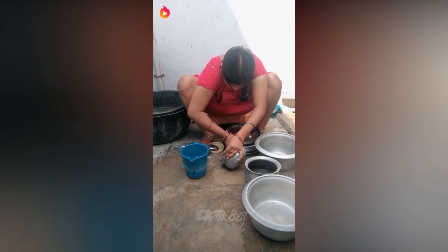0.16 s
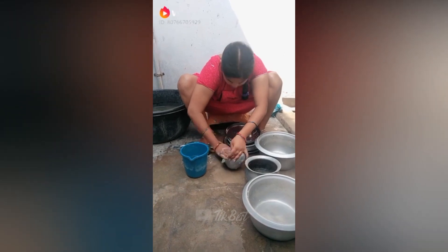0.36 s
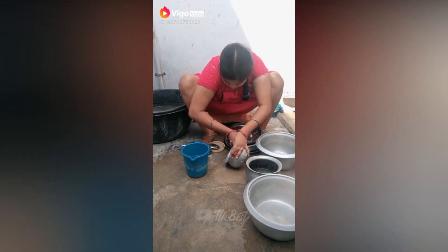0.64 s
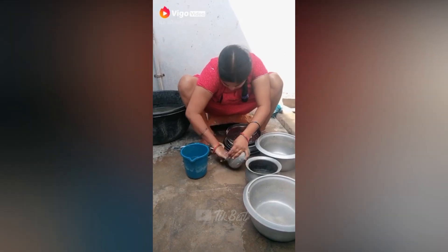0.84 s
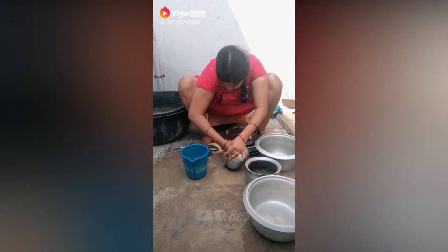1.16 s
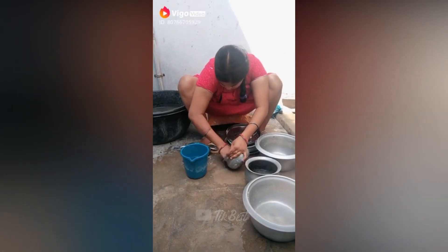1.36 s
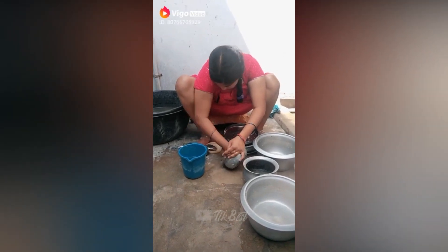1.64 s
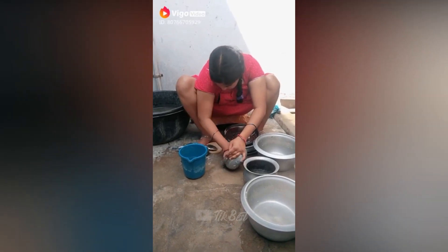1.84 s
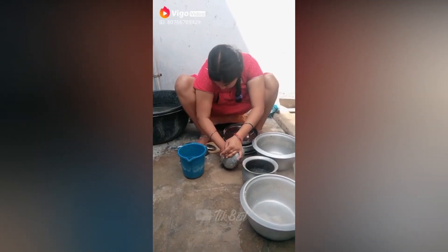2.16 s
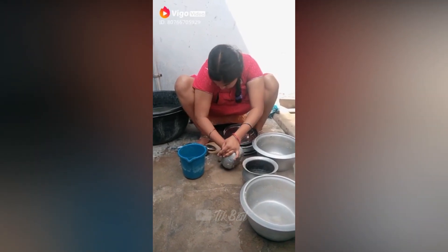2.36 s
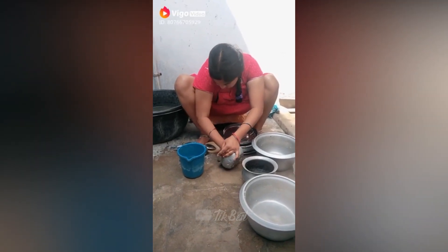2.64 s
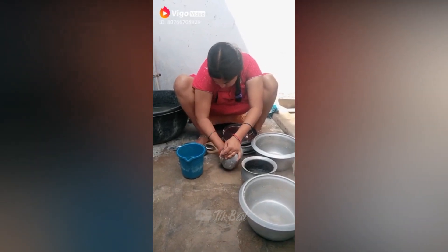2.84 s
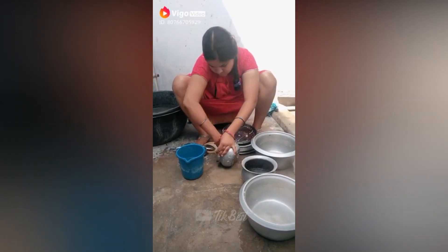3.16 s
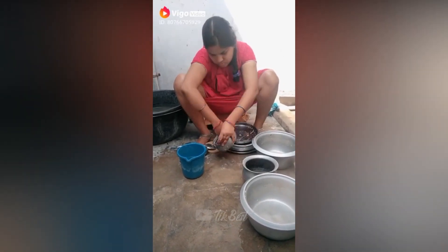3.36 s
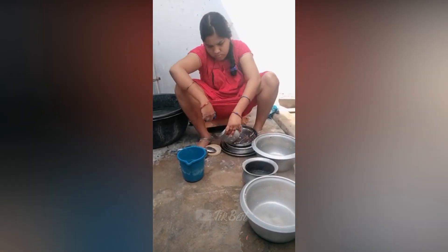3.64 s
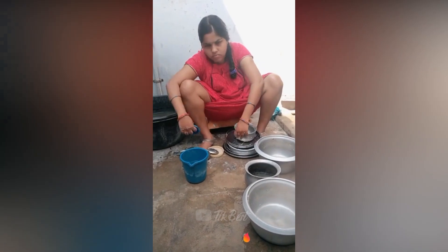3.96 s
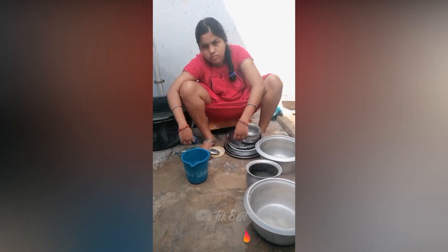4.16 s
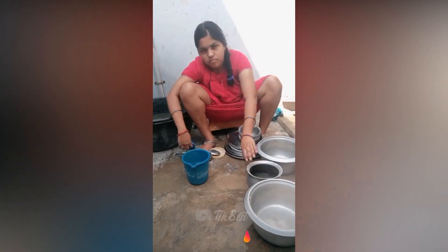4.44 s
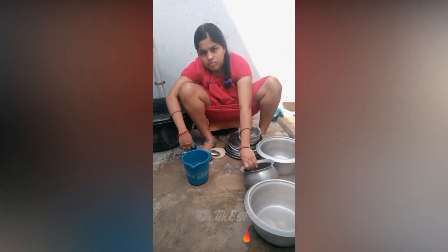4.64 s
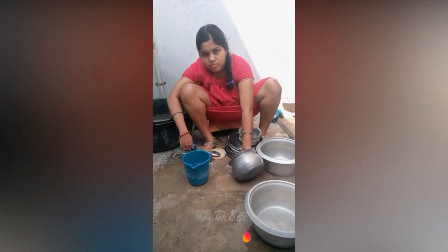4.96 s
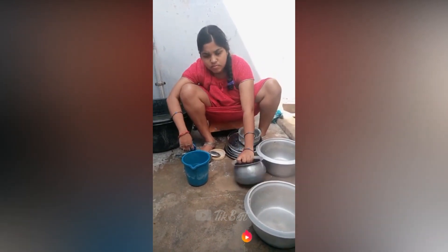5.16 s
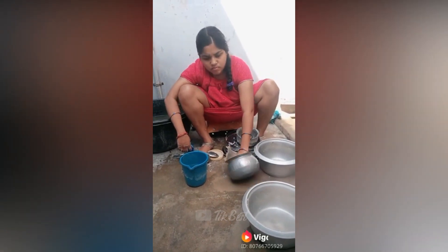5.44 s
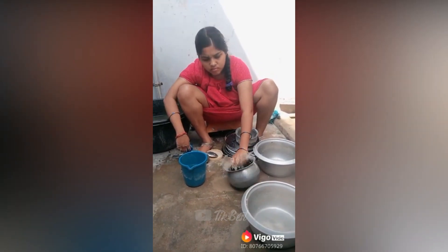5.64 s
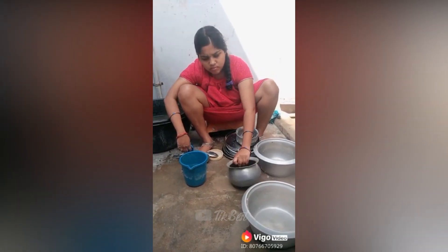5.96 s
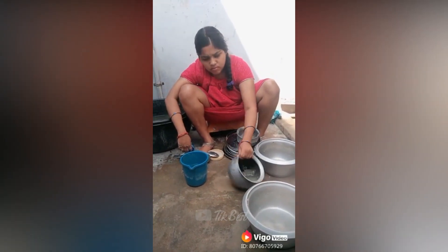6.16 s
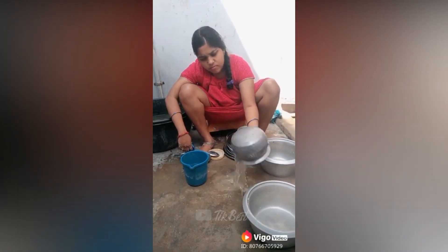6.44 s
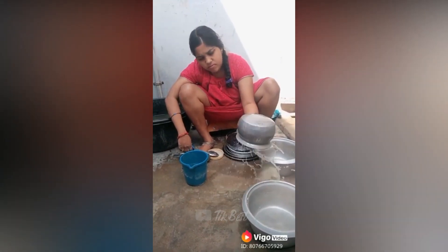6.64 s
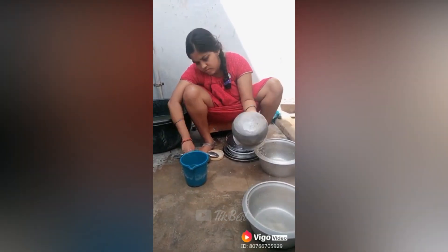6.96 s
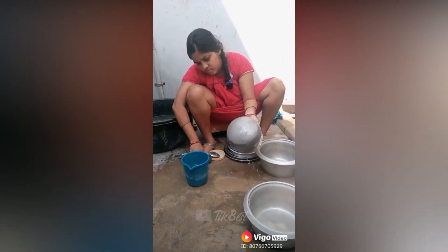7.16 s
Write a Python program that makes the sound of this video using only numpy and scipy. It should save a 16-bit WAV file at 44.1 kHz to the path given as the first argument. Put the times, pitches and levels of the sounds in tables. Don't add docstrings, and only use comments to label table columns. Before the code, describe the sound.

Dishes are washed outdoors beside a close wall. First come dry, grainy scrubbing strokes on a singing steel cup, growing stronger near two seconds, broken by sharp taps on concrete. The cup meets a chattering plate stack, then a heavier pot thuds, drags and clanks with a dented ring. Finally water sloshes, spatters and slaps down. Low distant rumble throughout; a near, slightly dull, compressed recording, clear on the left and heavily muffled on the right.

```python
import sys
import numpy as np
from scipy import signal
from scipy.io import wavfile
from scipy.ndimage import uniform_filter1d

SR = 44100
rng = np.random.default_rng(int(sys.argv[2]) if len(sys.argv) > 2 else 0)


def natural_amplitude(level_db):
    exponent = np.asarray(level_db, float) / 20
    return 10 ** exponent


def transcribe(signal):
    frames = np.atleast_2d(signal).T
    limited = np.clip(frames, -1, 1)
    pcm = np.round(limited * 32767).astype(np.int16)
    wavfile.write(sys.argv[1], SR, pcm)


N = 322371
TIME_S = np.arange(N) / SR
RINSE_S = 4.5
RINSING = TIME_S > RINSE_S

# f/Hz, level/dB per Hz
YARD_SPECTRUM = [(15, -46), (25, -18.5), (112, 0), (156, -12), (620, -24.5), (802, -38), (1640, -54.5),
                 (5500, -120)]
YARD_DB = -53
HUM_HZ, HUM_WIDTH_HZ, HUM_DB = 101.86, 6.6, -59
ECHO_T60_S, ECHO_DB, COVERED_ECHO_DB = 0.29, -14.5, -3

# t/s, peak level/dB, f/Hz, cycles rung, pitch rise 0-1
FLOOR_BUMPS = [
    (4.618, -8.5, 187, 4.2, 0.04),
    (5.03, -25.5, 91.7, 13, 0.3),
]
# t/s, peak level/dB, f/Hz, cycles rung, pitch rise 0-1
GRIP_BUMPS = [
    (1.319, -25, 86.1, 3.5, 0.011),
    (1.799, -32, 99.6, 7.5, 0.0052),
    (2.848, -30, 91.5, 6.5, 0),
    (2.889, -28, 88, 5.4, 0.003),
    (6.119, -16, 73, 4.5, 0),
]
COVER_HZ, COVER_TOP_HZ, COVER_LEAD_SAMPLES = 125, 1600, 9
OWN_DB, SHARED_RUMBLE_GAIN = -58.5, .5
SELF_NOISE_DB = [
    [-87],
    [-80],
]

# f/Hz, level/dB per Hz
PAD_SPECTRUM = [(1470, -55), (2500, -13), (3170, -4), (3640, -3), (5070, 1), (11500, -4.5), (13000, -18),
                (14000, -53.5)]
# f/Hz, level/dB per Hz
WATER_SPECTRUM = [(1470, -36.5), (2500, 0), (3690, 11), (6200, 11.5), (8270, 12.5), (12700, -4),
                  (13400, 3.5), (14000, -50)]
# f/Hz, level/dB per Hz
GRIT_SPECTRUM = [(850, -16.5), (1100, -15), (1350, -10), (1700, 0), (2400, -7), (3500, -4.5)]
# f/Hz, width/Hz, level/dB
CUP_HOLLOW = [(197, 24, -3), (301, 31, -1), (484, 78, -1.5), (617, 37, 3.5), (717, 55, 2.5), (876, 200, -4)]
# f/Hz, width/Hz, level/dB
POT_HOLLOW = [(187, 72, -4.5), (309.2, 15.7, 4), (383, 7.3, 1.5), (469, 49, -6), (561.5, 16.8, 5.5),
              (654, 52, -1.5), (880, 430, -13)]
# f/Hz, width/Hz, level/dB
CUP_SONG = [(1728, 92, 0.5), (2540, 150, 2), (3460, 340, 2.5), (4120, 25, -4.5), (5900, 530, -0.5),
            (6300, 37, 0.5), (7380, 81, -31.5), (8000, 67, -1), (9200, 120, -2)]
# f/Hz, width/Hz, level/dB
POT_SONG = [(1060, 13, -6), (1470, 51, -5.5), (1703, 20, -9), (2120, 28, -1.5), (2326, 30, -7),
            (2650, 86, -12), (2865, 26, -7.5), (3150, 35, -14), (3527, 30, -8.5), (3900, 27, -3),
            (5000, 110, -18.5), (5855, 51, -8.5), (7360, 45, -8), (8300, 34, -6)]
STEEL_LOW_HZ, STEEL_HIGH_HZ, STEEL_WIDTH_HZ, STEEL_DB = 1014, 10840, 20, -9.5

# t/s of full pressure, hold/s, hiss level/dB
STROKES = [(0.001, 0.0035, -49), (0.144, 0.037, -46.5), (0.335, 0.027, -47), (0.85, 0.088, -47.5),
           (1.051, 0.12, -47.5), (1.329, 0.078, -52), (1.584, 0.14, -48), (1.781, 0.22, -46.5),
           (2.08, 0.18, -44.5), (2.361, 0.17, -43), (2.6, 0.39, -48), (3.052, 0.12, -59), (3.3, 0.043, -60)]
STROKE_GRIT_DB, STROKE_DRAG_DB, STROKE_RISE_DB_PER_S, STROKE_FALL_DB_PER_S = -15, -20, 310.5, 304
# t/s of full contact, hold/s, hiss, grit, drag level/dB
SLIDES = [(0.01, 1.8, -105, -72, -73), (0.49, 0.094, -42.5, -47.5, -45), (0.64, 0.13, -66.5, -69, -49.5),
          (1.88, 0.1, -55, -44, -53.5), (2.19, 0.73, -60.5, -49, -65), (3.76, 0.055, -96, -70, -82),
          (4.08, 0.064, -29.5, -31, -46), (4.22, 0.11, -55, -42.5, -54), (4.56, 0.021, -91, -66, -47),
          (4.63, 0.11, -35.5, -30.5, -38.5), (4.84, 0.21, -34, -37.5, -33.5), (5.26, 0.15, -60, -51, -50),
          (5.205, 0.11, -63, -49, -61), (1.25, 0.51, -88, -77, -91.5), (3.0, 0.33, -93, -62, -65),
          (5.38, 0.12, -84, -90, -58)]
SLIDE_RISE_DB_PER_S, SLIDE_FALL_DB_PER_S = 402.5, 148
# t/s of full flow, hold/s, hiss, grit, drag level/dB
FLOWS = [
    (5.955, 0.058, -80, -67, -47),
    (5.66, 0.087, -71, -52, -49),
    (5.83, 0.15, -33, -38, -65),
    (6.03, 0.15, -47, -32.5, -38),
    (6.3, 0.071, -48, -57, -63.5),
    (6.45, 0.27, -34, -39.5, -61),
    (6.8, 0.37, -40, -48.5, -59.5),
]
FLOW_RISE_DB_PER_S, FLOW_FALL_DB_PER_S = 405, 206

# f/Hz, level/dB, t60/s
CUP_MODES = [(690, -5.5, 0.17), (1920, -29, 0.1), (2563, 4, 0.059), (4060, -24, 0.34), (4900, -41.5, 0.3),
             (5450, 10, 0.017), (6500, -41.5, .08), (7600, -19.5, 0.062), (9050, -7, 0.03)]
# f/Hz, level/dB, t60/s
POT_MODES = [(911, -28, 1.6), (1061, -21, .5), (1492, -9, .3), (1691, -19, .9), (2100, -8, .22),
             (2925, -31, .7), (1297, -33, 1.2), (3873, -18, .28), (4667, -14, .12), (5770, -20, .3),
             (6573, -16, .25), (7440, -17, .15), (5420, -16, .15), (8958, -21, .2)]
# f/Hz, level/dB, t60/s
POT_TWINS = [(925, -41.5, 0.95), (1080, -27, 0.44), (1344, -15, 0.32), (1523, -9.5, 0.38),
             (2140, -19.5, 0.18), (3900, -15.5, .1)]
# t/s, peak level/dB, body re peak/dB, t60/s, ringing/dB
CUP_TICKS = [(0.577, -27.5, -11, 0.034, -44), (0.757, -16.5, -23, 0.054, -19), (0.774, -41, -9, 0.24, -7.5),
             (0.881, -41, -20, 0.087, -13), (1.633, -42.5, -13.5, 0.23, -25), (1.703, -44, -30, 0.073, -30),
             (1.934, -35.5, 3.5, 0.23, -2), (2.184, -35, -9.5, 0.15, -9), (2.347, -45, -39, 0.13, -10),
             (2.471, -32.5, -11.5, 0.12, -12.5), (2.541, -61, -20, 0.08, -22), (2.827, -34, -14, 0.15, -27),
             (2.966, -44, -17, 0.2, -24), (3.2865, -27, -43, 0.026, -22), (3.29, -45, -9.5, .3, -33),
             (3.4765, -37, 3, 0.031, -26), (3.48, -44.5, 0, 0.35, -37), (4.014, -22, 4, 0.077, -27),
             (4.167, -30, -2.5, 0.18, -8), (4.211, -35, -1.5, 0.24, -9), (4.355, -31, -5, 0.046, -28)]
# t/s, peak level/dB, body re peak/dB, t60/s, ringing/dB
CUP_KNOCKS = [
    (0.478, -48.5, -1, 1, -51),
    (0.518, -43.5, 2, 0.23, -36.5),
    (2.154, -44, 2.5, 0.18, -30),
    (2.804, -27.5, -3.5, 0.31, -5.5),
    (3.216, -60.5, 3.5, 0.54, -13),
    (3.912, -29.5, 6.5, 0.2, -16.5),
    (4.034, -29, 6, 0.17, -19),
    (4.381, -38, -0.5, 0.25, 0.5),
]
# t/s, peak level/dB, body re peak/dB, t60/s, ringing/dB
CUP_THUMPS = [
    (0.629, -42, -1.5, 0.13, -14),
    (2.702, -43, -10, 0.19, -24),
    (2.858, -43.5, -28.5, 0.078, -21),
    (3.929, -38.5, -7.5, 0.38, 2),
]
# t/s, peak level/dB, body re peak/dB, t60/s, ringing/dB
POT_BLOWS = [
    (4.54, -45.5, -8, 0.23, -25),
    (4.6078, -20.5, -1.5, 0.05, -2),
    (4.6203, -73, -14, .36, 16),
    (4.8551, -37.5, 6.5, 0.045, 5),
    (5.0034, -56.5, 7, 0.31, 3),
    (5.1933, -17, -11, 0.15, 1.5),
    (5.3753, -42.5, -3.5, 0.18, -1.5),
]
# t/s, peak level/dB, body re peak/dB, t60/s
SLAPS = [(5.6047, -28.5, -4, 0.24), (5.6547, -52, -7, 0.071), (5.6682, -29.5, -6, 0.23),
         (5.8846, -30.5, -18, 0.24), (5.9469, -47, -19, .05), (5.9684, -33, -7, 0.032),
         (6.1051, -32.5, -9, 0.17), (6.119, -35, -5, 0.15), (6.162, -34.5, -22, 0.15),
         (6.2477, -49, 4, 0.22), (6.2585, -46.5, -25, 0.34), (6.399, -36, -9, 0.085),
         (6.4131, -27.5, -1.5, 0.11), (6.49, -51, 8, 0.23), (6.531, -37, -3, 0.033),
         (6.5543, -26, -12, 0.043), (6.6738, -31, -42, 0.079), (6.7022, -34, -33, 0.2),
         (6.7446, -21, -16.5, 0.34), (6.8053, -22, 2, 0.11), (6.8704, -30.5, -22, 0.13),
         (6.8977, -25.5, -8, 0.062), (6.9558, -30.5, -6, 0.021), (6.9955, -47, -20, 0.039),
         (7.0307, -27, -17, 0.21), (7.1093, -38, -33, 0.012), (7.155, -39, -34, 0.084),
         (7.2468, -53.5, -44, 0.4), (7.2873, -68, -38, 0.059)]
# t/s, peak level/dB, body re peak/dB, t60/s
SLOSHES = [
    (6.0058, -33, -11.5, 0.25),
    (6.045, -54, 13, 0.17),
    (6.073, -49.5, 7, 0.16),
]
TICK_THUD_DB, KNOCK_THUD_DB, THUMP_THUD_DB = -10.5, 1, 20.5
POT_THUD_DB, SLAP_THUD_DB, SLOSH_THUD_DB = 1.5, -13.5, 17
WATER_RINGING_DB = -23
IMPACT_GAIN, IMPACT_S = 0.46, 0.0037

# t/s, peak level/dB
CRACKS = [(0.61, -13), (0.7583, -11), (1.933, -35), (2.1815, -20), (2.3468, -38), (2.472, -25.5),
          (2.805, -6), (3.2856, -42), (3.476, -28), (3.91, -33), (4.0116, -19), (5.1953, -30.5),
          (5.668, -15), (5.968, -11), (6.413, -36), (6.7434, -29), (6.8063, -24), (6.872, -23),
          (7.246, -46), (7.289, -46)]
# t/s, peak level/dB, f/Hz, decay/ms
TICKS = [(0.569, -27, 945, 2.7), (0.628, -16.5, 7860, 10.3), (0.753, -17, 7840, 5.1),
         (1.937, -20.5, 3100, 7), (2.184, -24, 6000, 2.8), (2.348, -23.5, 5000, 5), (2.471, -34, 5150, 4.0),
         (2.806, -24.5, 784, 4.2), (2.825, -10.5, 5050, 4.8), (2.86, -21.5, 3400, 4.5),
         (3.287, -27, 5840, 2.9), (3.479, -24.5, 2685, 3.6), (3.913, -22.5, 890, 5.7),
         (4.38, -28, 740, 7.4), (4.561, -32, 990, 9.0), (4.818, -25, 1530, 5.6), (4.95, -22.5, 2350, 2.5),
         (5.022, -17.5, 6200, 2.2), (5.319, -32, 1950, 6.1), (5.7, -22.5, 6460, 7.5),
         (5.82, -49, 2294, 2.5), (5.849, -29, 1860, 4.9), (5.891, -17, 3440, 13), (5.908, -18.5, 7770, 3.3),
         (5.948, -30, 2250, 3.2), (5.969, -18.5, 7800, 3), (6.016, -21, 3730, 2), (6.043, -24, 2150, 6.5),
         (6.071, -22, 1490, 4.5), (6.119, -20, 3870, 5.7), (6.196, -39, 2260, 4.0), (6.26, -27, 5330, 4.0),
         (6.356, -45, 8000, 4.5), (6.414, -27, 1920, 8.6), (6.594, -42, 7810, 3.1),
         (6.745, -3.5, 7120, 7.3), (6.81, -12, 1900, 1.9), (6.873, -20, 6810, 3.5), (6.896, -20, 2750, 3.3),
         (7.043, -20, 2892, 7.2), (7.108, -19, 8900, 1.9), (7.117, -25, 6510, 4.7),
         (7.246, -26.5, 8900, 14), (7.289, -26, 6740, 9.2)]
# t/s, peak level/dB, f/Hz, decay/ms
CHATTER = [
    (4.019, -12, 2430, 13),
    (4.050, -18, 2300, 9.8),
    (4.092, -21, 4700, 10.0),
    (4.118, -16, 5300, 8.8),
    (4.242, -28, 4900, 9.7),
]
TICK_DB, TICK_WIDTH_RATIO = -7.5, .22
# t/s, peak level/dB, f/Hz, cycles rung, pitch rise (last pitch is f times 1 + 2
DROPS = [(0.629, -27, 617, 50, 0.05), (2.700, -33, 717, 35, 0), (3.477, -17, 2426, 110, 0.11),
         (4.380, -30, 990, 40, 0), (5.200, -19, 1070, 110, 0.05), (5.604, -30, 570, 52, 0),
         (5.628, -19, 2090, 68, 0.04), (6.004, -18.5, 297, 50, 1.56), (6.036, -11.5, 573, 72, 0),
         (6.389, -31.5, 1450, 290, 0), (6.412, -29, 1785, 50, 0), (6.490, -23.5, 2350, 83, 0.18),
         (6.526, -24, 1600, 40, 0), (6.549, -29.5, 1060, 98, 0.1), (6.558, -31, 1640, 50, 0),
         (6.638, -23, 1870, 49, 0), (6.698, -38, 1060, 320, 0.02), (6.710, -28.5, 1510, 270, 0.02),
         (6.805, -8.5, 1700, 45, 0.1), (6.896, -27, 2060, 45, 0.2)]
# t/s, peak level/dB, f/Hz, cycles rung, pitch rise 0-1
CATCHES = [(4.537, -41, 3160, 200, 0), (4.608, -11.5, 1045, 83, 0), (4.610, -17, 1715, 94, 0.08),
           (4.612, -33, 3750, 210, 0), (4.650, -21, 1060, 140, 0.02), (4.656, -25, 2095, 170, 0),
           (4.676, -31, 3900, 300, 0), (4.687, -23, 1498, 160, 0), (4.734, -28.5, 1695, 220, 0),
           (4.780, -35.5, 1510, 610, 0), (4.801, -24, 1083, 86, 0), (4.850, -28, 2360, 140, 0.13),
           (4.980, -23.5, 2110, 100, 0.15), (5.070, -32, 1910, 130, 0)]
NOTE_ROUGHNESS, NOTE_SWELL_CYCLES = 0.88, 9.0

# f/Hz, level/dB
HEARING = [(200, -110), (550, -88.5), (1100, -93.5), (3000, -100), (11000, -100), (12800, -107),
           (13400, -82)]
MASK_DB, ROUND_OFF, COVERED_PENALTY_DB = -29.5, 0.78, 8
NEIGHBOUR_DB, FAMINE_DB, STEP_ERROR_DB = -10.5, 5, 4
CUTOFF_HZ = 14300


def rms_one(x):
    return x / np.sqrt(np.mean(x ** 2) + 1e-20)


def at_hz(points, hz):
    points = np.array(points)
    return np.interp(np.log(hz), np.log(points[:, 0]), points[:, 1])


def band(x, low_hz, high_hz):
    return signal.sosfilt(signal.butter(2, [low_hz, high_hz], "band", fs=SR, output="sos"), x)


def drift(rate_hz):
    r = np.exp(-80 * np.pi * rate_hz / SR)
    slow = signal.lfilter([1], [1, -2 * r, r * r], rng.standard_normal(N // 40 + 2002))[2000:]
    return np.interp(np.arange(N) / 40, np.arange(len(slow)), rms_one(slow))


def resonance(x, hz, width_hz):
    r = np.exp(-np.pi * width_hz / SR)
    poles = [1, -2 * r * np.cos(2 * np.pi * hz / SR), r * r]
    return signal.lfilter(np.array([1, 0, -1]) * (1 - r * r) / 2, poles, x)


def resonant(source, peaks):
    out = 0
    for k, (hz, width_hz, level_db) in enumerate(peaks):
        out = out + natural_amplitude(level_db) * resonance(source, hz, width_hz) * (-1) ** k
    return rms_one(out)


def ring(clicks, hz, t60_s):
    r = natural_amplitude(-60 / (t60_s * SR))
    w = 2 * np.pi * hz / SR
    return signal.lfilter([0, np.sin(w)], [1, -2 * r * np.cos(w), r * r], clicks + 1e-18)


def grains(per_s, spread_db):
    size_draw, time_draw = rng.random((2, N))
    sizes = natural_amplitude(spread_db * np.minimum(-np.log(size_draw + 1e-9), 5))
    sizes = sizes * np.sign(time_draw * SR / per_s - .5)
    return rms_one(sizes * (time_draw < per_s / SR))


def coloured(source, spectrum, patchy_db, patch_hz):
    low_hz, high_hz = spectrum[0][0], spectrum[-1][0]
    edges = low_hz * 2 ** np.arange(0, np.log2(high_hz / low_hz) + .1, 1 / 3)
    out = 0
    for k, (low, high) in enumerate(zip(edges, edges[1:])):
        gain = natural_amplitude(at_hz(spectrum, np.sqrt(low * high)) + patchy_db * drift(patch_hz))
        out = out + gain * band(source, low, high) * (-1) ** k
    return rms_one(out)


def yard():
    hum = resonance(rng.standard_normal(N), HUM_HZ, HUM_WIDTH_HZ)
    hum = resonance(hum, HUM_HZ, 2 * HUM_WIDTH_HZ)
    rumble = coloured(rng.standard_normal(N), YARD_SPECTRUM, 0.77, 0.88)
    return natural_amplitude(YARD_DB) * rumble, natural_amplitude(HUM_DB) * rms_one(hum)


def walls(x):
    t = np.arange(SR // 2) / SR
    tail = band(rng.standard_normal(len(t)), 210, 11000) * natural_amplitude(-60 * t / ECHO_T60_S) * (t > .008)
    return signal.fftconvolve(x, tail / np.sqrt(np.sum(tail ** 2)))[:N]


def cover_rumble():
    gain = natural_amplitude(OWN_DB + 2.0 * drift(12.0))
    return gain * rms_one(band(band(rng.standard_normal(N), 43, 250), 44, 560))


def through_cover(air):
    lows = signal.lfilter(*signal.butter(1, COVER_HZ, fs=SR), air)
    return signal.lfilter(*signal.butter(3, COVER_TOP_HZ, fs=SR), np.roll(lows, -COVER_LEAD_SAMPLES))


def plops(table, gain_db, swell_cycles=1):
    out = np.zeros(N)
    for s, peak_db, hz, cycles, rise in table:
        turns = hz * np.arange(int(cycles * SR / hz)) / SR
        wave = np.sin(2 * np.pi * turns * (1 + rise * turns / cycles))
        wave = wave * natural_amplitude(-50 * turns / cycles) * (1 - np.exp(-turns / swell_cycles))
        out[round(s * SR):][:len(wave)] += natural_amplitude(peak_db + gain_db) * wave
    return out


def ticks():
    out = np.zeros(N)
    t = np.arange(SR // 12) / SR
    for s, peak_db, hz, decay_ms in TICKS + CHATTER:
        spray = rng.standard_normal(len(t)) * np.exp(-1000 * t / max(decay_ms, .3))
        wave = resonance(spray, hz, TICK_WIDTH_RATIO * hz)
        part = out[round(s * SR):][:len(t)]
        part += (natural_amplitude(peak_db + TICK_DB) * 2 * wave / np.abs(wave).max())[:len(part)]
    return out


def cracks():
    out = np.zeros(N)
    t = np.arange(SR // 100) / SR
    for s, peak_db in CRACKS:
        spray = rng.standard_normal(len(t)) * np.exp(-t / 0.0016)
        out[round(s * SR):][:len(t)] += natural_amplitude(peak_db - 9.5) * spray
    return band(out, 1800, 19000)


def steel(source):
    hz = np.geomspace(STEEL_LOW_HZ, STEEL_HIGH_HZ, num=30) * rng.uniform(.96, 1.04, size=30)
    level_db = at_hz(WATER_SPECTRUM, np.minimum(hz, 4000)) / 2 + rng.normal(0, 3.6, len(hz))
    return resonant(source, zip(hz, np.full(len(hz), STEEL_WIDTH_HZ), level_db))


def hollow(source):
    return np.where(RINSING, resonant(source, POT_HOLLOW), resonant(source, CUP_HOLLOW))


def contacts(rows, thud_db):
    out = []
    for s, peak_db, body_db, t60_s, *ringing_db in rows:
        out.append((s, peak_db, body_db, body_db + thud_db, t60_s, *(ringing_db or [WATER_RINGING_DB])))
    return out


def blows(table, modes, colour, damping, twins=()):
    top, body, thud = np.zeros((3, N))
    for s, peak_db, body_db, thud_db, t60_s, _ in table:
        at = round(s * SR)
        t = np.arange(min(N - at, SR // 3)) / SR
        fade = natural_amplitude(peak_db - 60 * t / max(t60_s, .01)) * (1 - np.exp(-t / .0008))
        fade *= (1 + IMPACT_GAIN * np.exp(-t / IMPACT_S)) / np.sqrt(1 + IMPACT_GAIN)
        top[at:at + len(t)] += fade
        body[at:at + len(t)] += fade * natural_amplitude(body_db)
        thud[at:at + len(t)] += fade * natural_amplitude(thud_db) * (1 - np.exp(-t / .002))
    out = top * colour[0] + body * colour[1] + thud * colour[2]
    rows = np.array(table)
    starts = np.round(rows[:, 0] * SR).astype(int)
    chance_db = rng.normal(0, 1.2, (len(rows), len(modes)))
    for k, (hz, level_db, t60_s) in [*enumerate(modes), *enumerate(twins)]:
        clicks = np.zeros(N)
        clicks[starts] = natural_amplitude(rows[:, 1] + rows[:, 5] + level_db + chance_db[:, k])
        out += ring(clicks, hz, t60_s / damping)
    return out


def pressure(rows, rise_db_per_s, fall_db_per_s):
    t = np.arange(0, N + 64, 64) / SR
    out = 1e-6
    for s, held_s, *level_db in rows:
        loss_db = rise_db_per_s * np.maximum(s - t, 0) + fall_db_per_s * np.maximum(t - s - held_s, 0)
        out = out + natural_amplitude(np.array(level_db)[:, None] - loss_db)
    return np.array([np.interp(TIME_S, t, row) for row in out])


def movements():
    strokes = [(s, held_s, db, db + STROKE_GRIT_DB, db + STROKE_DRAG_DB) for s, held_s, db in STROKES]
    gain = pressure(strokes, STROKE_RISE_DB_PER_S, STROKE_FALL_DB_PER_S)
    gain += pressure(SLIDES, SLIDE_RISE_DB_PER_S, SLIDE_FALL_DB_PER_S)
    gain += pressure(FLOWS, FLOW_RISE_DB_PER_S, FLOW_FALL_DB_PER_S)
    return 20 * np.log10(gain)


def rubbing(hiss_db, grit_db, drag_db):
    fibres = grains(9000.0, 1.0)
    pad = coloured(fibres, PAD_SPECTRUM, 1.7, 26.0) + natural_amplitude(-5.5) * resonant(fibres, CUP_SONG)
    spatter = grains(3300.0, 0.89) * natural_amplitude(4.3 * drift(35.0))
    water = coloured(spatter, WATER_SPECTRUM, 0.4, 6.4)
    hiss = np.where(RINSING, water, pad)
    grit_grains = grains(2200.0, 0.91)
    grit = coloured(grit_grains, GRIT_SPECTRUM, 3.0, 18.0)
    pot_dragged = (TIME_S > POT_BLOWS[1][0]) * (TIME_S < POT_BLOWS[-2][0])
    song = resonant(grit_grains, POT_SONG) * pot_dragged
    song = song + natural_amplitude(-14.5) * steel(grit_grains) * ~RINSING
    drag = hollow(grains(700.0, 2.6))
    return natural_amplitude(hiss_db - 6.5) * hiss + natural_amplitude(grit_db - 9.0) * (grit + natural_amplitude(4.5) * song) + natural_amplitude(drag_db + 1.0) * drag


def washing():
    cup = contacts(CUP_TICKS, TICK_THUD_DB) + contacts(CUP_KNOCKS, KNOCK_THUD_DB)
    cup += contacts(CUP_THUMPS, THUMP_THUD_DB)
    pot = contacts(POT_BLOWS, POT_THUD_DB)
    water = contacts(SLAPS, SLAP_THUD_DB) + contacts(SLOSHES, SLOSH_THUD_DB)
    rattle = grains(6000.0, 3.3)
    bright = coloured(rattle, WATER_SPECTRUM, 4.0, 20.0)
    body = coloured(rattle, GRIT_SPECTRUM, 3.0, 20.0)
    bright = bright + natural_amplitude(STEEL_DB) * np.where(RINSING, resonant(rattle, POT_SONG), steel(rattle))
    colour = bright, body, hollow(grains(1500.0, 3.8))
    flutter = 1 + NOTE_ROUGHNESS * np.tanh(rms_one(band(rattle, 9.7, 90)))
    dishes = rubbing(*movements())
    dishes += blows(cup, CUP_MODES, colour, 0.72)
    dishes += blows(pot, POT_MODES, colour, 0.86, POT_TWINS)
    dishes += cracks()
    dishes += blows(water, POT_MODES, colour, 0.78)
    return dishes + plops(DROPS + CATCHES, 0.64, NOTE_SWELL_CYCLES) * flutter


def scene():
    dishes = washing()
    rumble, hum = yard()
    common = dishes + natural_amplitude(ECHO_DB) * walls(dishes) + hum + plops(FLOOR_BUMPS, 0)
    own = cover_rumble() + plops(GRIP_BUMPS, 2.3)
    common += ticks()
    covered_echo = natural_amplitude(COVERED_ECHO_DB) * band(walls(dishes), 600, 4000)
    covered = through_cover(common + covered_echo + SHARED_RUMBLE_GAIN * rumble)
    return np.array([common + rumble, covered + own])


def thin_bands(x):
    hz, _, lines = signal.stft(x, SR, window="cosine", nperseg=1024)
    starts = np.r_[0:96:4, 96:len(hz):8]
    widths = np.diff(np.r_[starts, len(hz)])
    start_bin = starts[:, None]
    level = np.sqrt(np.add.reduceat(np.abs(lines) ** 2, starts, axis=1) / widths[:, None])
    famine = rms_one(uniform_filter1d(rng.standard_normal(level.shape), size=12, axis=2))
    limit = natural_amplitude(at_hz(HEARING, hz[starts] + 90)[:, None] + FAMINE_DB * famine)
    limit = limit + natural_amplitude(MASK_DB) * level[:, 6:].mean(axis=1, keepdims=True)
    limit = limit * natural_amplitude(np.array([0, COVERED_PENALTY_DB]))[:, None, None]
    neighbours = uniform_filter1d(level, size=7, axis=1) * (start_bin > 20)
    limit = limit + natural_amplitude(NEIGHBOUR_DB + FAMINE_DB * famine) * neighbours
    limit *= start_bin > 4
    kept = np.repeat(level > limit, widths, axis=1)
    kept &= np.abs(lines) > ROUND_OFF * np.repeat(np.sqrt(level * limit), widths, axis=1)
    error = natural_amplitude(STEP_ERROR_DB * famine[:, ::-1] * (start_bin > 50))
    lines = lines * kept * np.repeat(error, widths, axis=1)
    return signal.istft(lines, SR, window="cosine", nperseg=1024)[1][:, :N]


def guard_attacks(thinned, x):
    before = np.sqrt(uniform_filter1d(x ** 2, size=96, axis=1) + 1e-12)
    after = np.sqrt(uniform_filter1d(thinned ** 2, size=96, axis=1) + 1e-12)
    return thinned * uniform_filter1d(np.minimum(1, 1.5 * before / after), size=32, axis=1)


def low_pass(x):
    return signal.sosfilt(signal.butter(12, 14290, fs=SR, output="sos"), x)


def record(dry):
    rounded = signal.lfilter(*signal.butter(1, 35, "high", fs=SR), .8 * np.tanh(dry / .8))
    cut = signal.sosfilt(signal.cheby2(10, 50, CUTOFF_HZ, fs=SR, output="sos"), rounded)
    mix = guard_attacks(thin_bands(cut), cut)
    mix = mix + natural_amplitude(np.array(SELF_NOISE_DB)) * band(rng.standard_normal(cut.shape), 60, 12500)
    return low_pass(mix)


dry = scene()
out = record(dry)
transcribe(out)
```